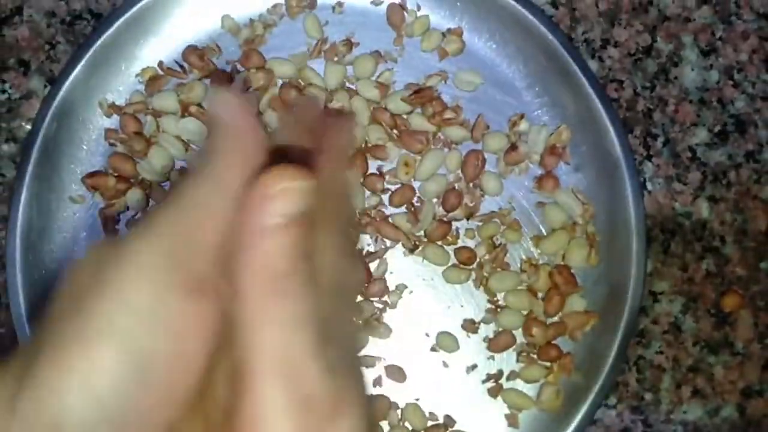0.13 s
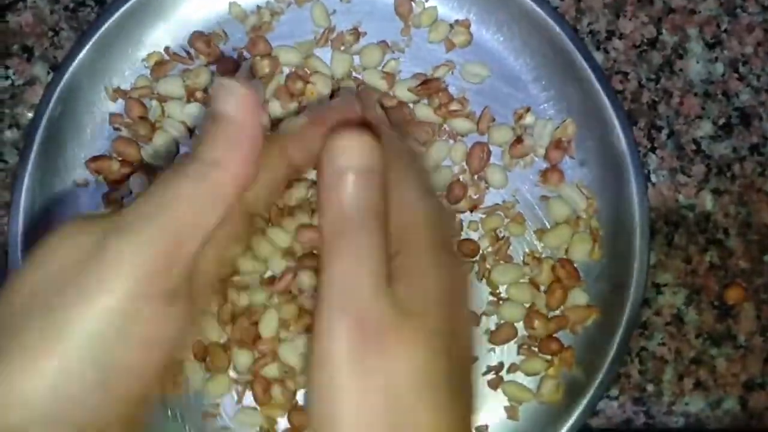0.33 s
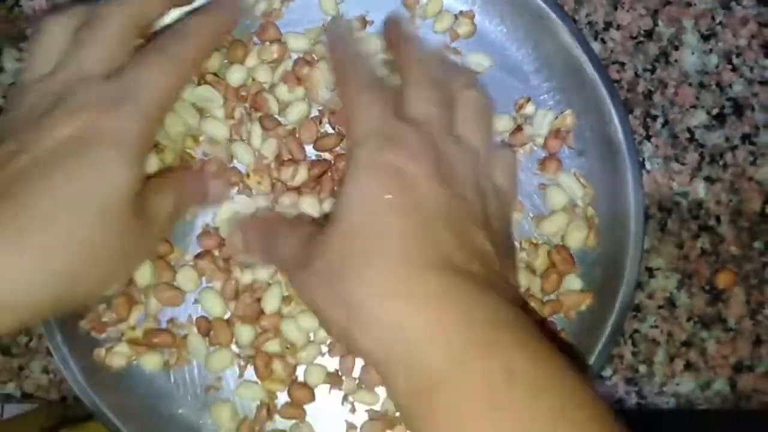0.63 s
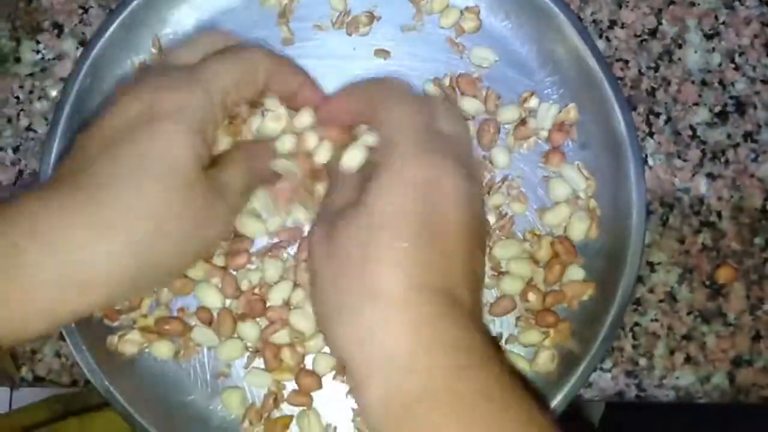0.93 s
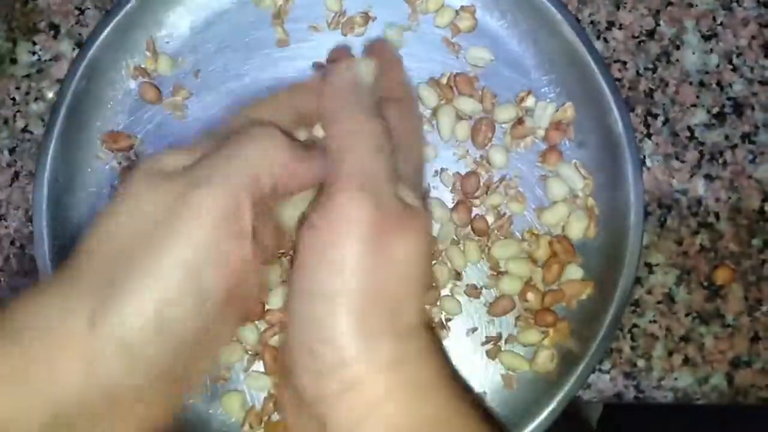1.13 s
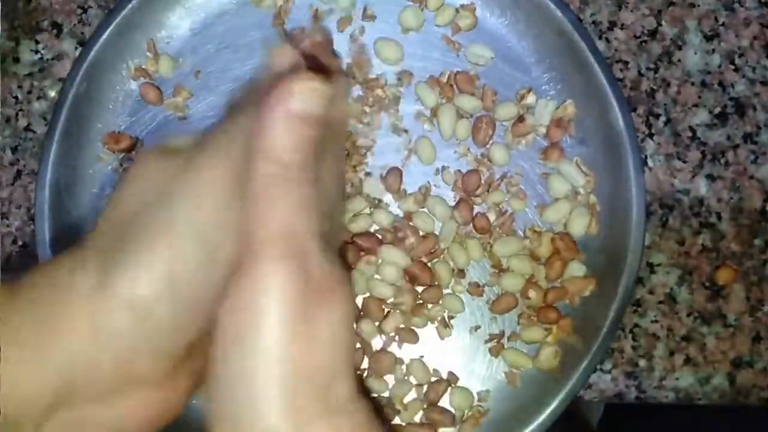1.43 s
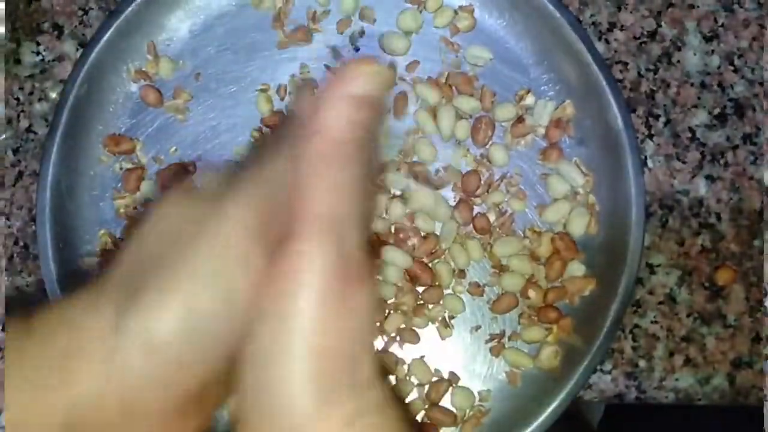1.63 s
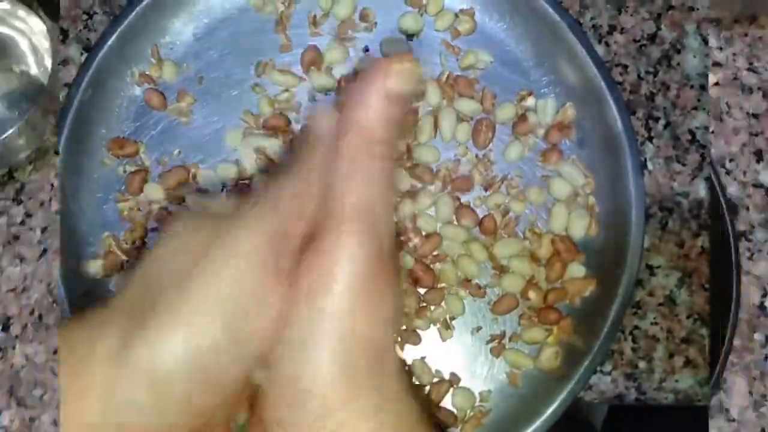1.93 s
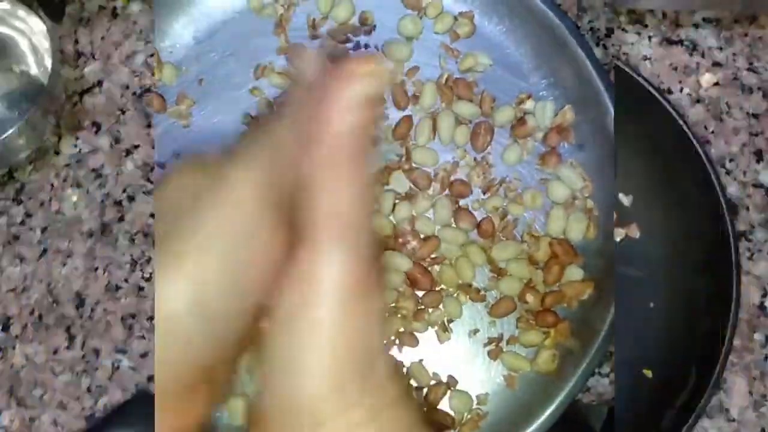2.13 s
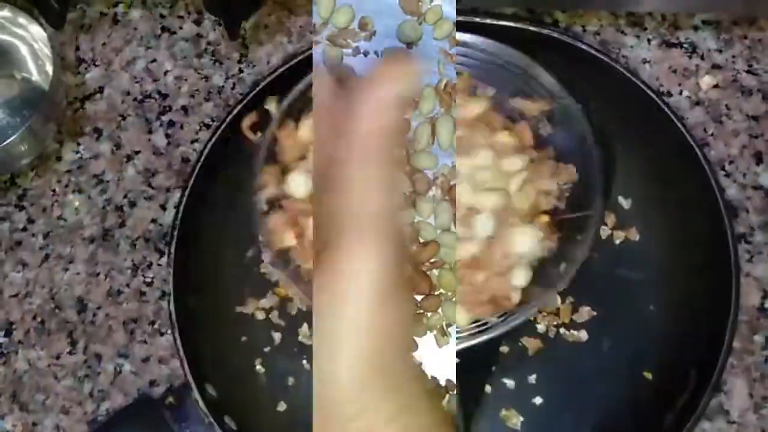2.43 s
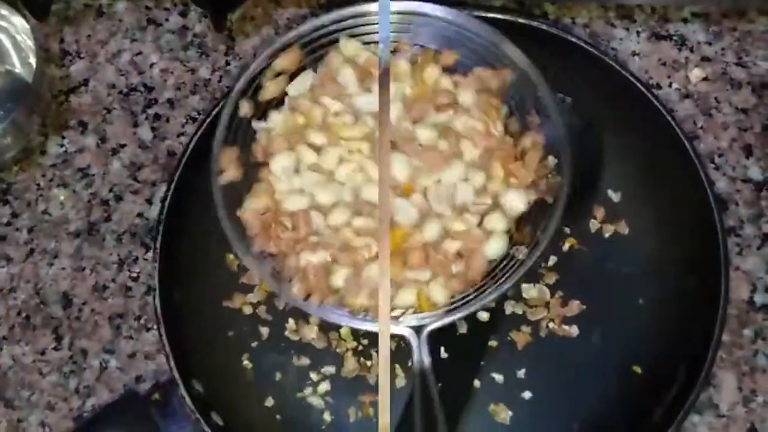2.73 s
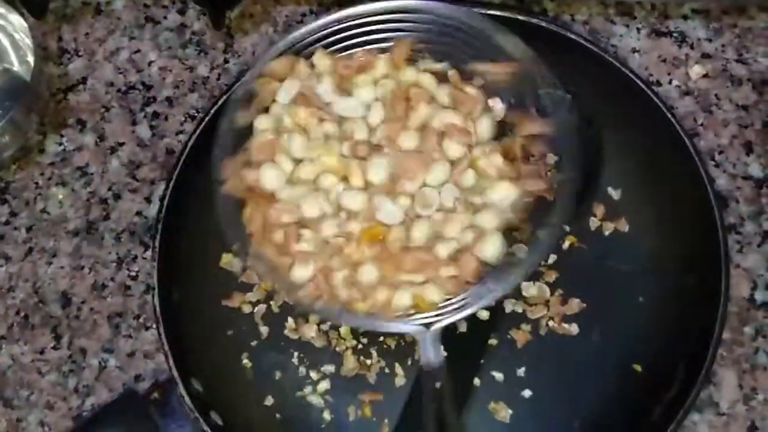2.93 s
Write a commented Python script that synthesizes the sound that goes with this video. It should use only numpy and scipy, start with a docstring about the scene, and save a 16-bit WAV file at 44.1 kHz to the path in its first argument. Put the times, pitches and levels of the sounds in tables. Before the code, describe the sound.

Roasted peanuts are rubbed between palms close by, their dry skins crackling while nuts jostle and drop onto a steel plate with brief ringing clicks. Near the end this gives way to a faint pan sizzle in a small kitchen.

```python
"""Roasted peanuts are rubbed between two palms over a steel plate in a small kitchen.
From the start the dry skins crackle, and nuts slide and jostle on the steel. Single nuts drop and
make the loaded plate ring briefly, muted at first, more openly once the hands lift.
Towards the end the rubbing gives way to the faint, steady sizzle of a pan on the stove,
and a last few nuts fall."""
import sys
import numpy as np
from scipy import signal
from scipy.fft import rfft, irfft
from scipy.io import wavfile

SR = 44100
rng = np.random.default_rng(int(sys.argv[2]) if len(sys.argv) > 2 else 0)


def generate_wav(signal):
    """Clip the signal to [-1, 1] and save it as 16-bit WAV at the path in sys.argv[1]."""
    frames = np.transpose(np.atleast_2d(signal))
    scaled = np.clip(frames, -1, 1) * 32767
    pcm = np.round(scaled).astype(np.int16)
    wavfile.write(sys.argv[1], SR, pcm)


N = 134505

# Colour of the kitchen's room tone: frequency_hz, relative_db
ROOM_TONE_EQ = [(25, 11), (65, 5), (100, 12.5), (150, 6.5), (240, 0), (2500, -2.5), (5500, -26),
                (9200, -15.5), (10500, -18.5), (13300, -9.5), (15500, -6)]
# Fader ride of the crackling skins: time_s, level_db
SKIN_FADER = [(0, -43), (.09, -32.5), (.14, -45), (.19, -37.5), (.3, -51.5), (.39, -34.5), (.55, -53),
              (.69, -47), (.76, -34.5), (.95, -34.5), (1.31, -37.5), (1.58, -34.5), (1.92, -36.5),
              (2.32, -44)]
# Colour of the skins: frequency_hz, relative_db
SKIN_EQ = [(500, -24), (1700, -2), (3700, 2.5), (5200, -2), (6800, 4.5), (8300, -6.5), (13000, -5.5),
           (15400, 4)]
# Skins that snap open: start_s, level_db, t60_s
SKIN_SNAPS = [(1.226, -29.5, 0.14), (1.4238, -19, .15), (2.118, -26, 0.054), (2.662, -28.5, 0.06)]
# Strongest modes of the plate: pitch_hz, relative_db
STRONG_MODES = [(1545, 1), (1711, 4), (1804, 5.5), (1903, 3), (2320, 7), (2545, 4), (2825, 7.5), (3030, 5),
                (3327, 6.5), (3420, 5), (3863, 4), (4005, -1), (6550, -1)]
# Contour of its crowded weaker modes: frequency_hz, relative_db
WEAK_MODE_CONTOUR = [(2000, 1), (3500, 3.5), (4800, -1), (6900, -6), (8300, -24), (15500, -27)]
# Colour of a nut on steel: frequency_hz, relative_db
KNOCK_EQ = [(150, -50), (500, -16.5), (1150, -11), (1600, 0), (3200, -0.5), (4700, -12.5), (6800, -4.5),
            (8300, -27), (15500, -33)]
# How hard the nuts are stirred: time_s, level_db
JOSTLE_FADER = [(0, -54), (.32, -47), (.39, -25), (.5, -35.5), (.63, -49), (.7, -49), (.79, -31),
                (.88, -32), (1.06, -35.5), (1.3, -42), (1.62, -34), (1.72, -42), (1.86, -38), (2.06, -50)]
# Nuts sliding on the steel: start_s, length_s, pitch_hz, level_db
NUT_SLIDES = [(.05, .14, 1660, -42), (.245, .06, 1600, -41), (.99, .24, 1720, -43)]
# Nuts striking the plate: start_s, level_db, treble_db, low_ring_db (optional)
NUT_DROPS = [(0.2198, -2, -15.5), (0.3345, -19, -24), (0.3669, -8, -14), (0.4225, -10, -24),
             (0.4368, 1.5, -26), (0.448, -1, -25), (0.468, 0, -18), (0.4975, -11, -35), (0.5326, -11, -40),
             (0.7253, -13, -18), (0.8255, -17, -8), (0.864, -6.5, -19, -17), (0.9562, -12.5, -13),
             (0.9835, -14, -16), (1.0196, -11, -30), (1.0295, -12.5, -35), (1.078, -12, -35, -17),
             (1.1802, -20, -22), (1.2438, -8.5, -22, -16), (1.295, -16, -22), (1.3475, -12.5, -27, -3),
             (1.4242, 1, -16.5, -22), (1.5125, -7.5, -16, -3.5), (1.5446, -3.5, -19, -10.5),
             (1.5602, -3, -17), (1.6005, -9, -16), (1.6065, -9.5, -17), (1.7625, -8, -17, -9.5),
             (1.7695, -11.5, -12), (1.779, -11, -8.5), (1.8245, -12.5, -21), (1.9398, -13, -15, -7),
             (1.9505, -16, -17), (2.1198, -17, -35, -13), (2.1435, -12.5, -12), (2.238, -20, -9, -14),
             (2.2925, -27, -10), (2.492, -15.5, -19, -13), (2.754, -19, -22)]
# Colour of the stove's rush: frequency_hz, relative_db
STOVE_EQ = [(28, 10), (55, -9), (200, -5.5), (400, -2), (1250, -1.5), (2200, -7.5), (6000, -28)]
# Steady tones of the stove: pitch_hz, width_hz, level_db
STOVE_HUM = [(90.4, 5.1, -46), (1157, 9.4, -48.5)]
# Colour of the pan's sizzle: frequency_hz, relative_db
SIZZLE_EQ = [(800, -5), (2500, 3), (5000, -3), (6700, 4), (8800, -13), (13000, -3.5), (15400, 8.5)]

HANDS_LIFT_S, MUTED_DB = 1.2, -4.5  # the hands mute early drops; the jostling stays muted throughout
NEUTRAL_TREBLE_DB, NEUTRAL_LOW_DB = -15, -30  # a knock at these settings keeps KNOCK_EQ as it is


def amp(db):
    """Decibels to gain."""
    return 10 ** (np.asarray(db) / 20)


def unit_rms(x):
    """Scales to an rms of one."""
    return x / np.sqrt(np.mean(x ** 2) + 1e-20)


def fader(points):
    """Gain over time from (time_s, level_db) points."""
    return amp(np.interp(np.arange(N) / SR, *np.transpose(points)))


def add(mix, start_s, sound):
    """Mixes a sound in at a given time."""
    part = mix[max(round(start_s * SR), 0):][:len(sound)]
    part += sound[:len(part)]


def eq(x, points):
    """Minimum-phase filter of unit energy, shaped by (frequency_hz, relative_db) points."""
    point_hz, db = np.transpose(points)
    hz = abs(np.fft.fftfreq(4096, 1 / SR))
    log_gain = np.log(amp(np.interp(np.log(hz + 1), np.log(point_hz), db)))
    taps = np.fft.ifft(np.exp(np.conj(signal.hilbert(log_gain)))).real[:len(hz) // 2]
    return signal.fftconvolve(x, taps / np.linalg.norm(taps))[:len(x)]


def decay(t60_s):
    """Half a second of exponential decay."""
    return np.exp(-np.log(1000) * np.arange(SR // 2) / SR / t60_s)


def wash(t60_s):
    """Countless dying resonances blur into a noise tail of unit energy."""
    tail = rng.standard_normal(SR // 2) * decay(t60_s)
    return tail / np.linalg.norm(tail)


def grains(per_s, spread_db):
    """Random clicks, most small and a few larger."""
    size = amp(spread_db * np.minimum(rng.exponential(1, N), 4))
    return size * rng.choice([-1, 1], N) * (rng.random(N) < per_s / SR)


def room_tone(level_db=-42.5, crossover_hz=720, fade_db_per_s=3.5):
    """A bed of faint hiss over a low rumble that slowly fades."""
    noise = amp(level_db) * eq(rng.standard_normal(N), ROOM_TONE_EQ)
    rumble = signal.sosfiltfilt(signal.butter(2, crossover_hz, fs=SR, output="sos"), noise)
    hiss = noise - rumble
    return hiss + rumble * amp(-fade_db_per_s * np.arange(N) / SR)


def crackling_skins(first_turn_s=1.315, stroke_s=.172, dip_db=-6):
    """Papery skins crumble between the palms, dipping as the rub turns; now and then one snaps."""
    crackle = unit_rms(grains(per_s=2500, spread_db=.5))
    strokes = np.maximum((np.arange(N) / SR - first_turn_s) / stroke_s, -.5)
    turn_dips = amp(dip_db * np.cos(np.pi * strokes) ** 2)
    out = fader(SKIN_FADER) * turn_dips * crackle
    for start_s, level_db, t60_s in SKIN_SNAPS:
        add(out, start_s, amp(level_db) * decay(t60_s) * rng.standard_normal(SR // 2))
    return eq(out, SKIN_EQ)


def plate_ring(pitch_hz, t60_s, low_cut_hz=1010):
    """One dying mode, with nothing below its low cut."""
    swing = np.sin(2 * np.pi * pitch_hz * np.arange(SR // 4) / SR) * decay(t60_s)[:SR // 4]
    return signal.lfilter(*signal.butter(2, low_cut_hz, "high", fs=SR), swing)


def steel_plate(weak_count=80, trim_db=-21.7):
    """Pitches and rings of the strong modes and of the weaker ones among and above them."""
    contour_hz, contour_db = np.transpose(WEAK_MODE_CONTOUR)
    spacing = (np.arange(weak_count) + rng.random(weak_count)) / weak_count
    weak_hz = contour_hz[0] + np.ptp(contour_hz) * spacing
    modes = list(STRONG_MODES) + list(zip(weak_hz, np.interp(weak_hz, contour_hz, contour_db)))
    rings = [amp(trim_db + db) * plate_ring(hz, t60_s=.12) for hz, db in modes]
    return np.array([hz for hz, db in modes]), np.array(rings)


def contact_ticks(rebounds=3, gap_s=.0035, first_db=7, step_db=-8, low_cut_hz=1100):
    """A nut's first touch and its quick, ever weaker rebounds: light ticks with no body."""
    ticks = np.zeros(SR // 2)
    times = np.cumsum(np.r_[0, gap_s * (.5 + rng.random(rebounds))])
    for bounce, start_s in enumerate(times):
        add(ticks, start_s, amp([first_db + bounce * step_db]))
    return signal.lfilter(*signal.butter(4, low_cut_hz, "high", fs=SR), ticks)


def nut_knock(plate, mute_db, treble_db, low_ring_db=NEUTRAL_LOW_DB, attack_s=.00067, scatter_db=11):
    """One nut on steel: a few ticks, a dense clatter and the plate's modes, weighted by where it lands."""
    def treble_shelf_db(hz):
        return (treble_db - NEUTRAL_TREBLE_DB) * np.interp(hz, [3000, 5500], [0, 1])

    def body_shelf_db(hz):  # a nut that wakes the lowest ring also knocks with more body
        return .22 * (low_ring_db - NEUTRAL_LOW_DB) * np.interp(hz, [1000, 1600], [1, 0])

    tail = wash(t60_s=.1 * amp(mute_db / 2))  # the clatter dies sooner on a muted plate
    clatter = amp(4.5) * tail * np.minimum(np.arange(len(tail)) / SR / attack_s, 1)
    colour = [(hz, db + treble_shelf_db(hz) + body_shelf_db(hz)) for hz, db in KNOCK_EQ]
    out = eq(clatter + contact_ticks(), colour)
    mode_hz, rings = plate
    landing = rng.uniform(-1, 1, len(mode_hz))
    mode_gains = np.sign(landing) * amp(mute_db + treble_shelf_db(mode_hz) - scatter_db * abs(landing))
    add(out, 0, mode_gains @ rings)
    add(out, 0, amp(low_ring_db - 3) * plate_ring(pitch_hz=1446, t60_s=.08))
    return out


def jostling_nuts(plate, spots=12, knocks_per_s=260):
    """Many light, dull knocks, spread over several spots of the plate."""
    out = np.zeros(N)
    for _ in range(spots):
        hits = grains(knocks_per_s / spots, spread_db=4.5)
        knock = nut_knock(plate, MUTED_DB, treble_db=-30, low_ring_db=-19)
        out += signal.oaconvolve(hits, knock)[:N]
    return fader(JOSTLE_FADER) * unit_rms(out)


def sliding_nuts(width_hz=280):
    """Nuts pushed across the steel: fine friction sings in a narrow band of the plate."""
    out = np.zeros(N)
    for start_s, length_s, pitch_hz, level_db in NUT_SLIDES:
        friction = rng.standard_normal(round(length_s * SR))
        band_hz = [pitch_hz - width_hz / 2, pitch_hz + width_hz / 2]
        scrape = signal.lfilter(*signal.butter(2, band_hz, "band", fs=SR), friction)
        add(out, start_s, amp(level_db) * unit_rms(scrape) * signal.windows.tukey(len(scrape)))
    return out


def falling_nuts(plate):
    """Single nuts slip from the hands onto the plate."""
    out = np.zeros(N)
    for start_s, level_db, *tone in NUT_DROPS:
        mute_db = MUTED_DB if start_s < HANDS_LIFT_S else 0
        add(out, start_s, amp(level_db) * nut_knock(plate, mute_db, *tone))
    return out


def sizzling_pan(start_s=2.286, fade_in_s=.27, level_db=-35):
    """Tiny bubbles burst in the pan and merge into a fine sizzle."""
    bubbles = unit_rms(grains(per_s=6000, spread_db=.5))
    fade_in = np.clip((np.arange(N) / SR - start_s) / fade_in_s, 0, 1)
    return amp(level_db) * eq(bubbles, SIZZLE_EQ) * fade_in


def stove(start_s=2.307, fade_in_s=.26, rush_db=-37):
    """A soft rush fades in with a hum of two narrow noise bands."""
    hz = np.fft.rfftfreq(N, 1 / SR)
    out = amp(rush_db) * eq(rng.standard_normal(N), STOVE_EQ)
    for pitch_hz, width_hz, level_db in STOVE_HUM:
        peak = 1 / (1 + (2 * (hz - pitch_hz) / width_hz) ** 2)
        hum = irfft(rfft(rng.standard_normal(N)) * peak, N)
        out += amp(level_db) * unit_rms(hum)
    fade_in = np.clip((np.arange(N) / SR - start_s) / fade_in_s, 0, 1)
    return out * fade_in


def subsonic_bump(start_s=2.388, rise_s=.064, peak_db=-22):
    """A slow, one-sided swell of the signal's baseline, below hearing."""
    rise = np.arange(SR // 2) / SR / rise_s
    out = np.zeros(N)
    add(out, start_s, amp(peak_db) * rise * np.exp((1 - rise ** 2) / 2))
    return out


def scene(reverb_db=-7.5):
    """Mono mix: nuts and skins in the kitchen's short reverb, everything else dry."""
    plate = steel_plate()
    nuts = falling_nuts(plate) + jostling_nuts(plate) + sliding_nuts() + crackling_skins()
    reverb = amp(reverb_db) * signal.fftconvolve(nuts, wash(t60_s=.19))[:N]
    return (nuts + reverb + stove() + sizzling_pan() + subsonic_bump() + room_tone())[None]


def record(dry):
    """Master chain: a hard clip just under full scale, then a steep high cut."""
    high_cut = signal.firwin(511, cutoff=15760, window=("kaiser", 9), fs=SR)
    return signal.oaconvolve(np.clip(dry, -.9, .9), high_cut[None], "same")


dry = scene()
out = record(dry)
generate_wav(out)
```